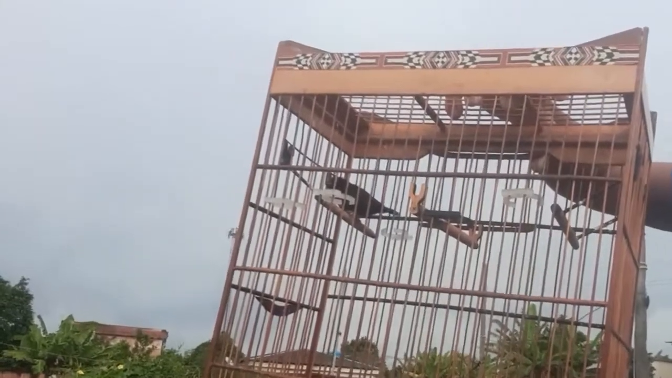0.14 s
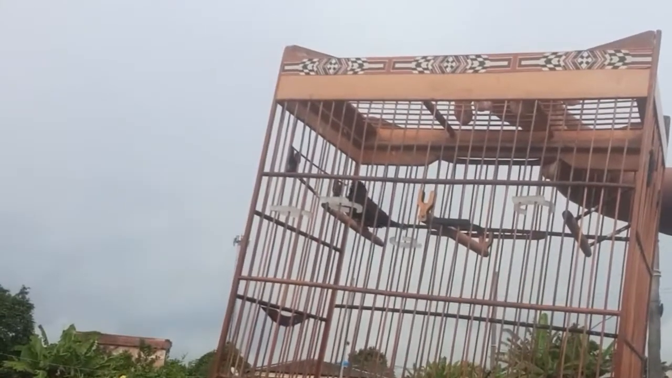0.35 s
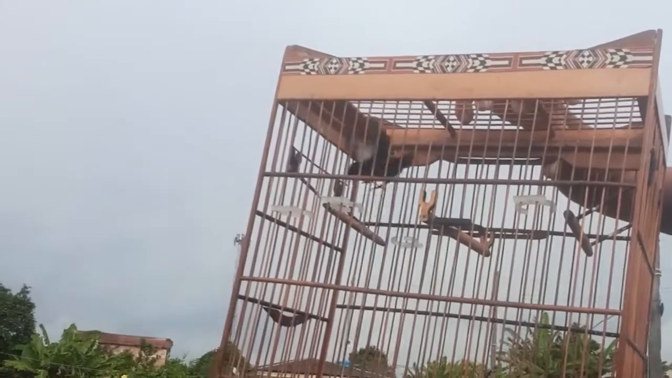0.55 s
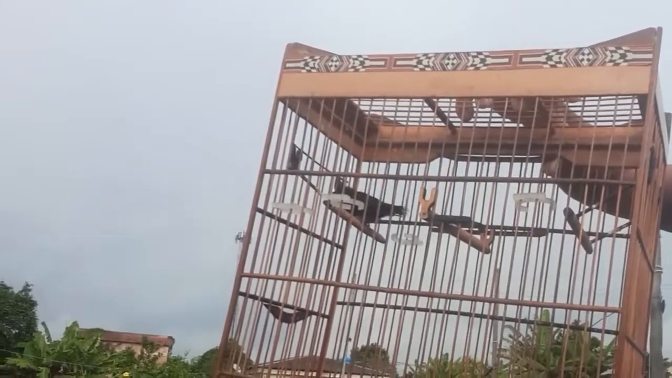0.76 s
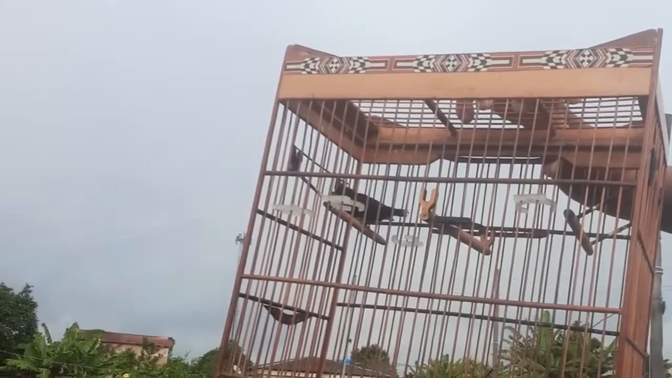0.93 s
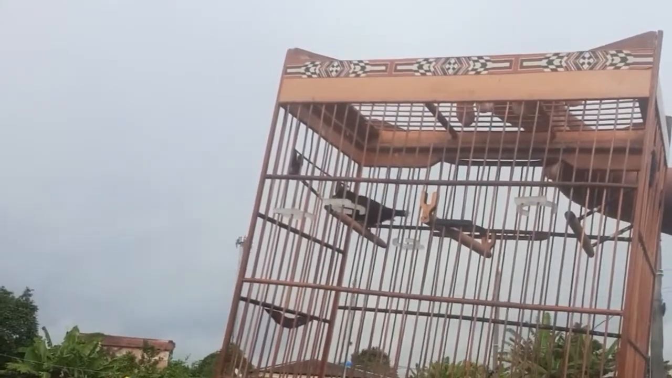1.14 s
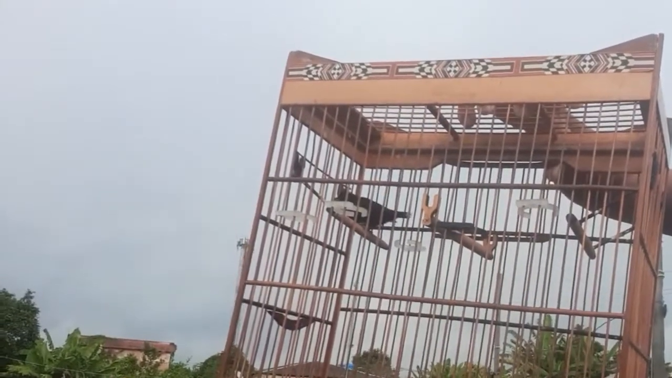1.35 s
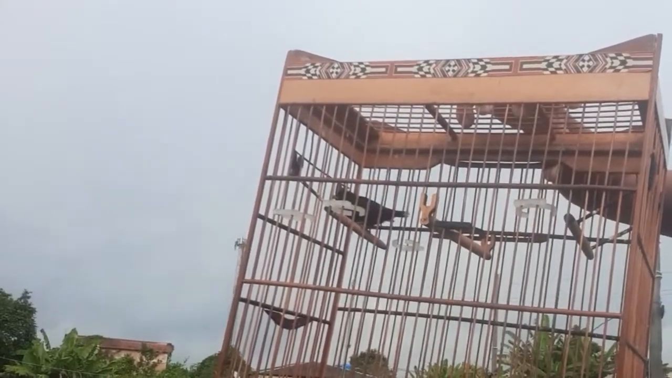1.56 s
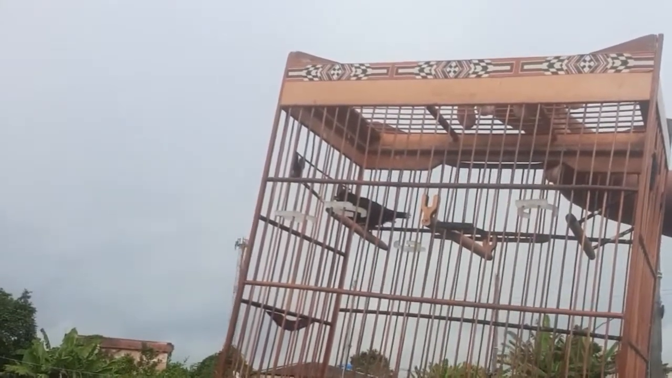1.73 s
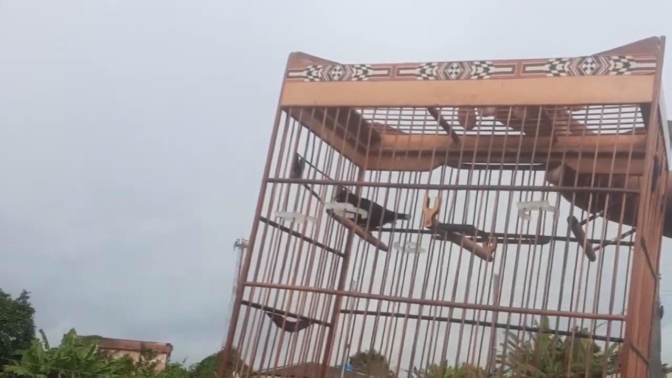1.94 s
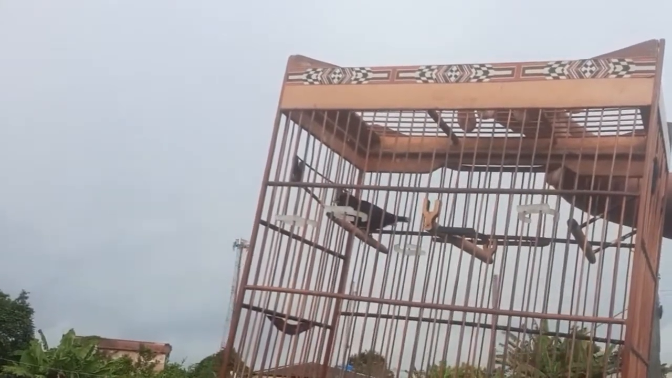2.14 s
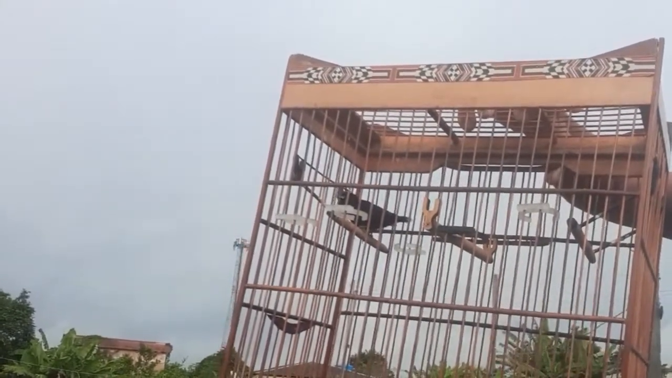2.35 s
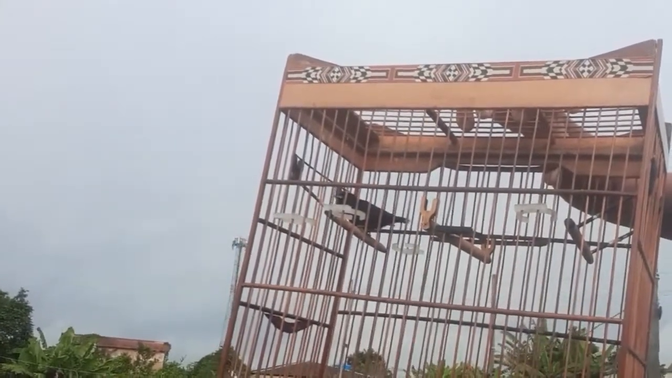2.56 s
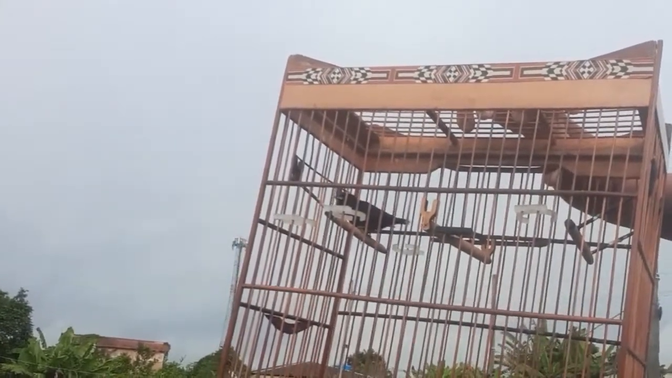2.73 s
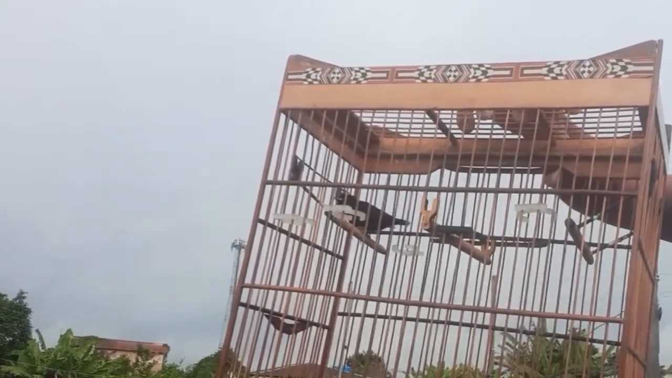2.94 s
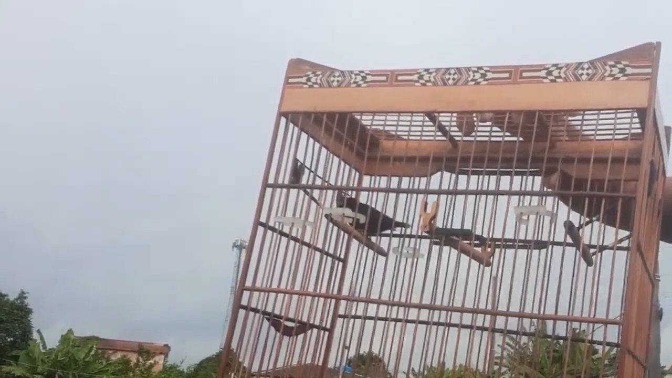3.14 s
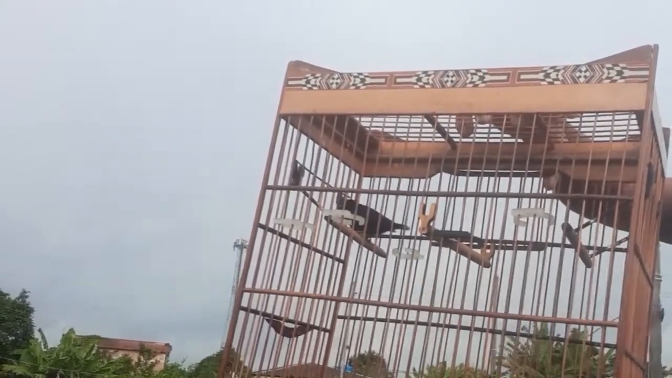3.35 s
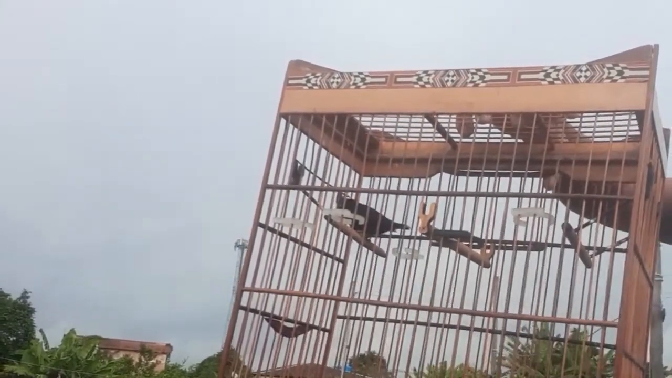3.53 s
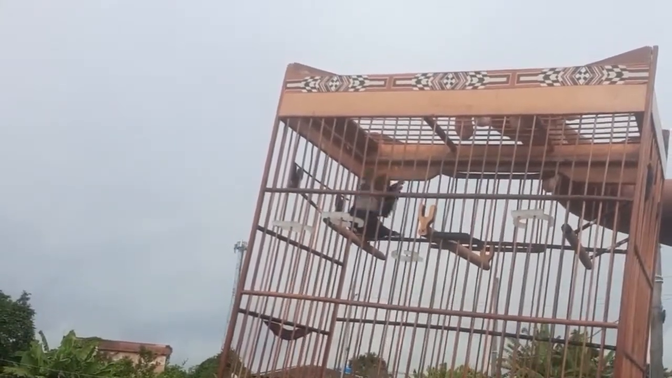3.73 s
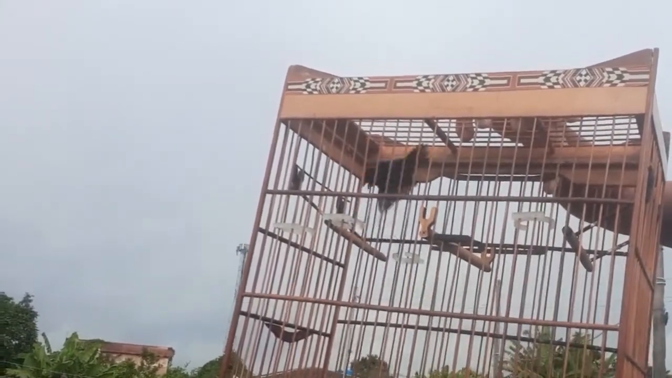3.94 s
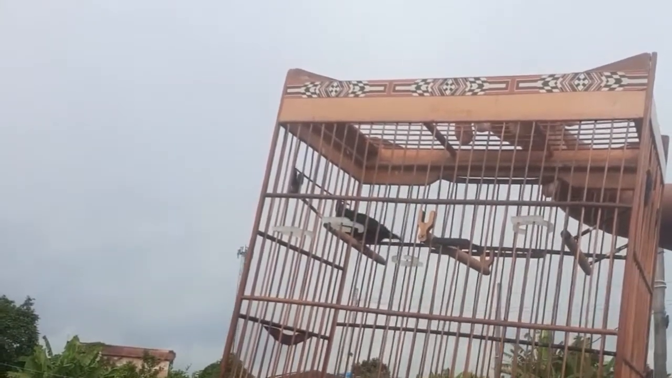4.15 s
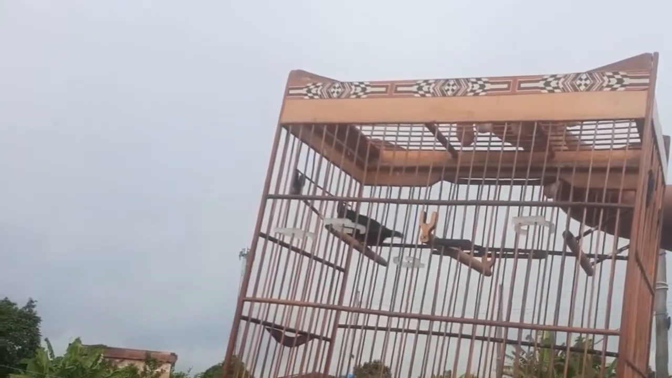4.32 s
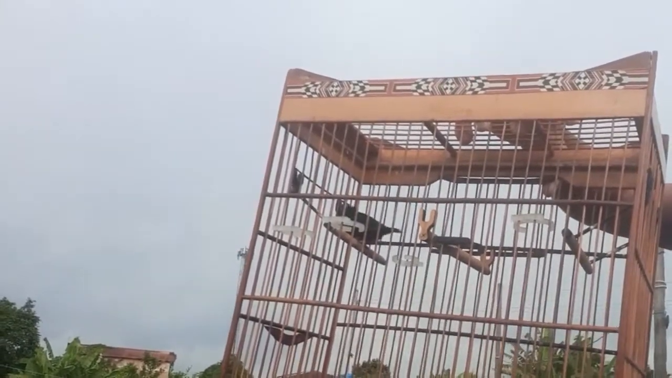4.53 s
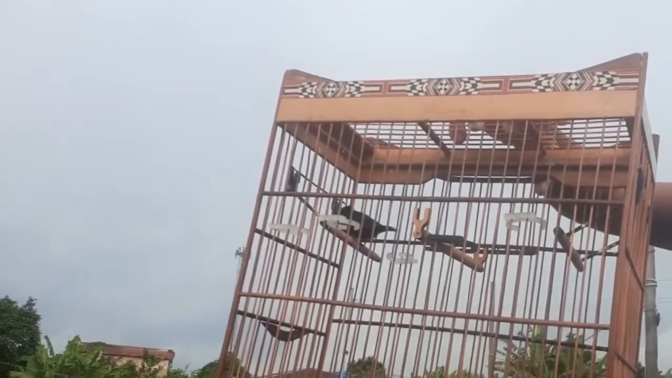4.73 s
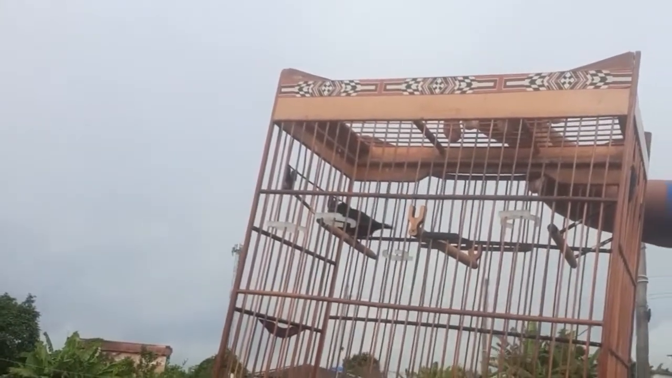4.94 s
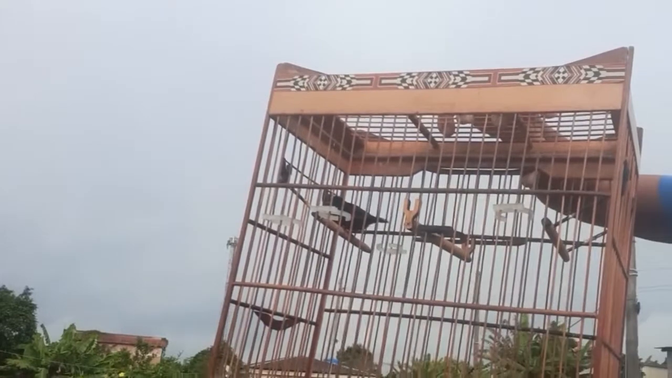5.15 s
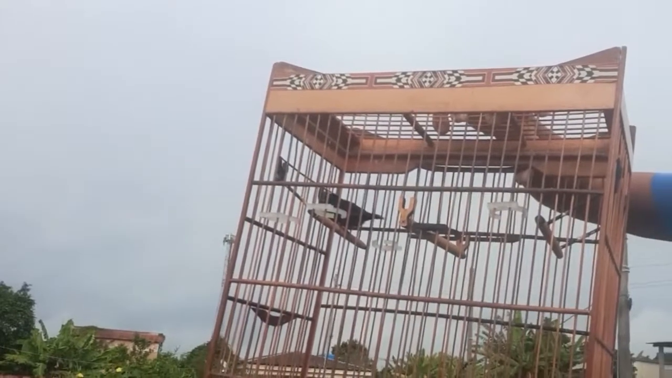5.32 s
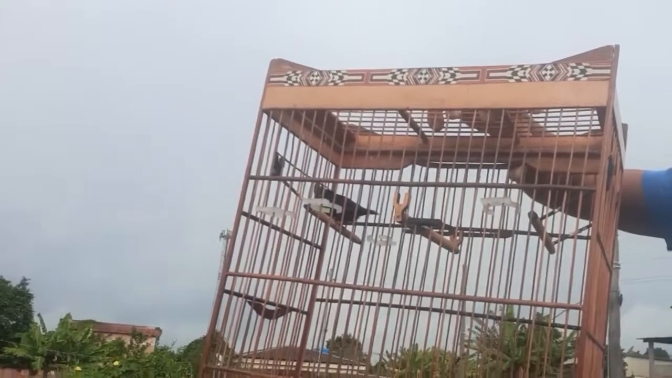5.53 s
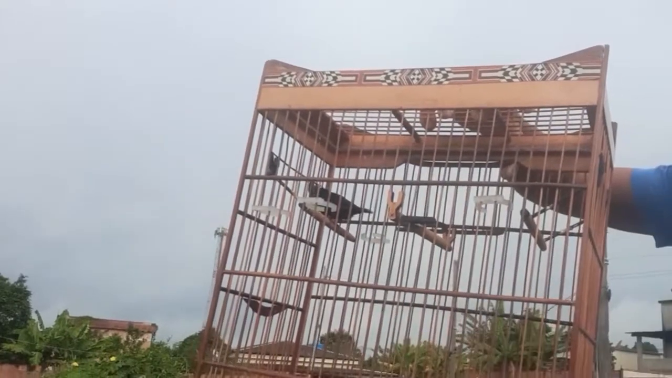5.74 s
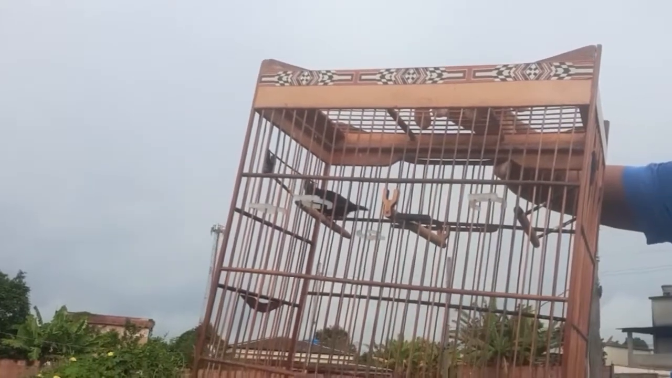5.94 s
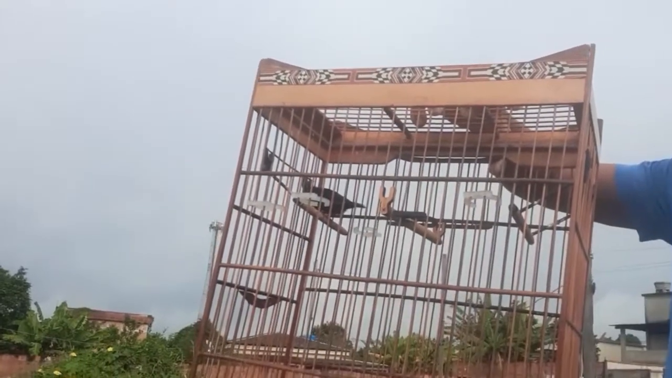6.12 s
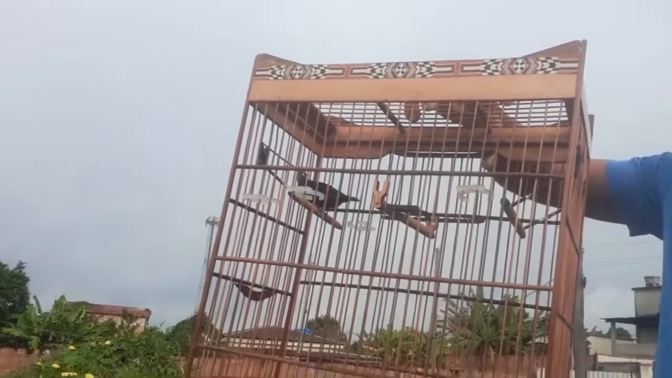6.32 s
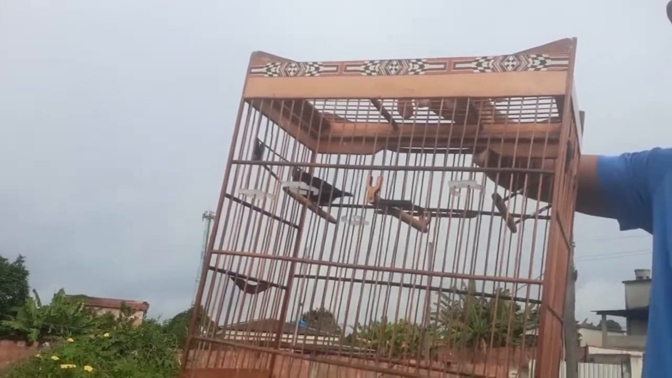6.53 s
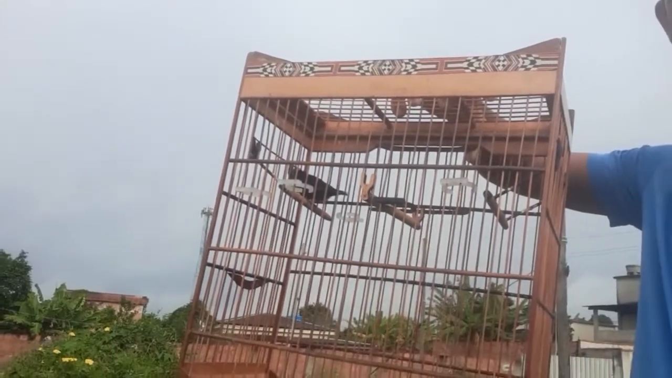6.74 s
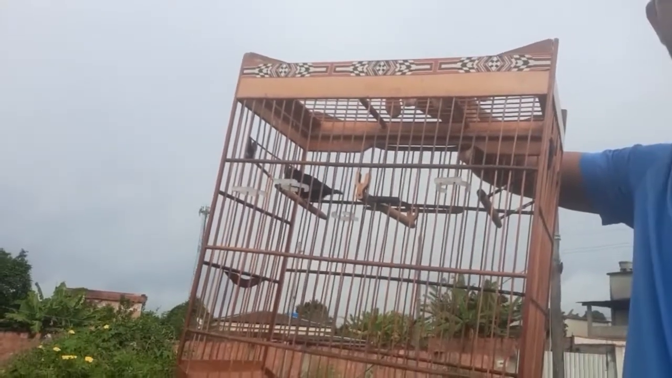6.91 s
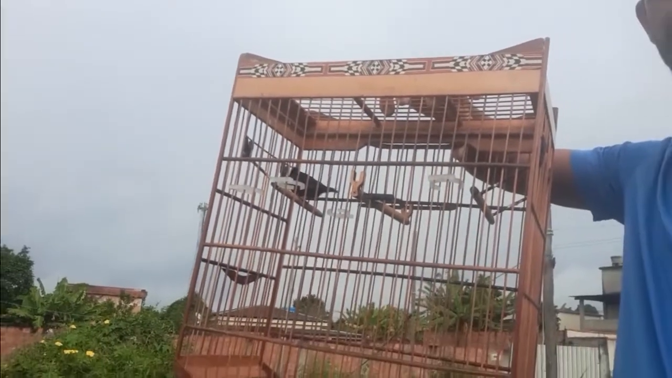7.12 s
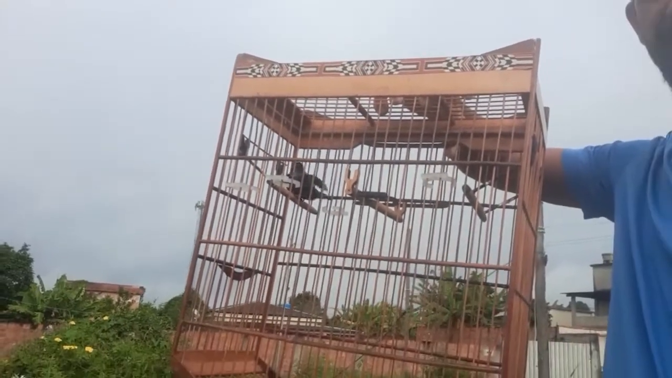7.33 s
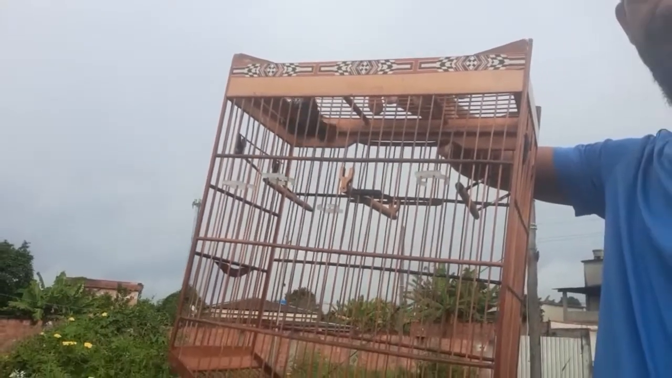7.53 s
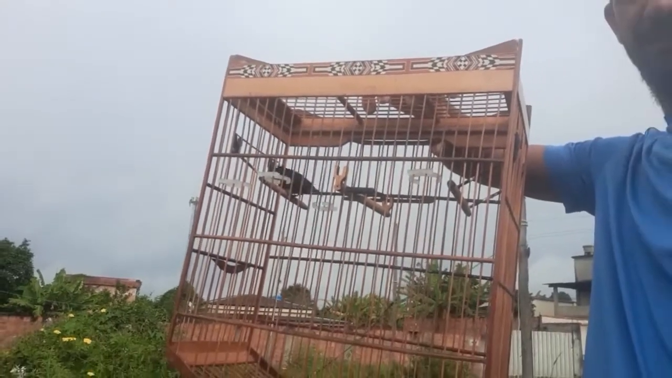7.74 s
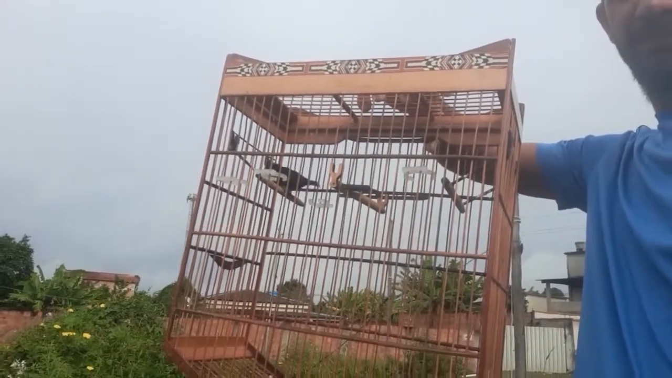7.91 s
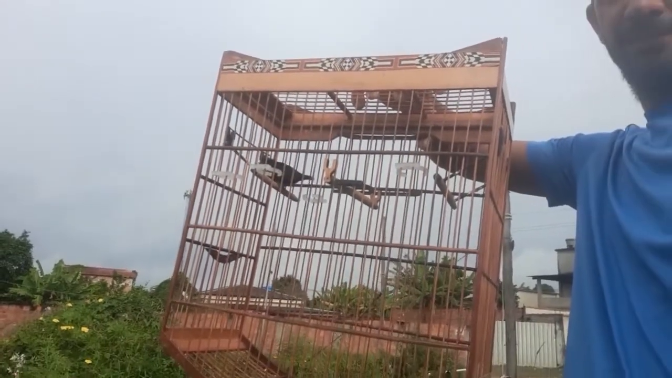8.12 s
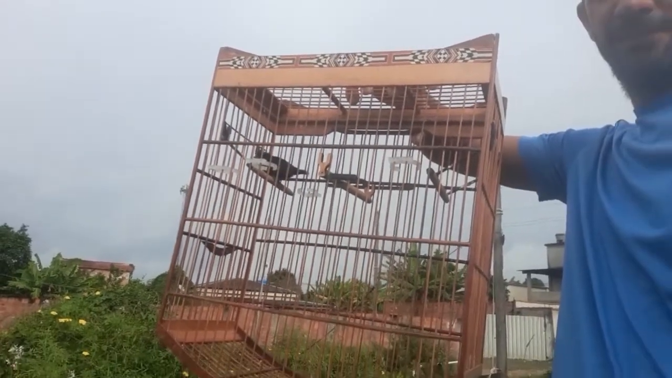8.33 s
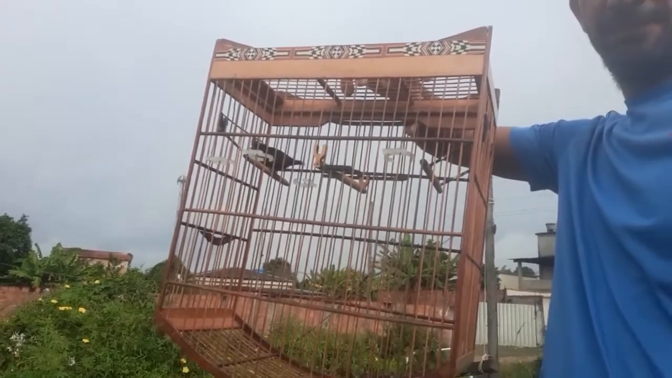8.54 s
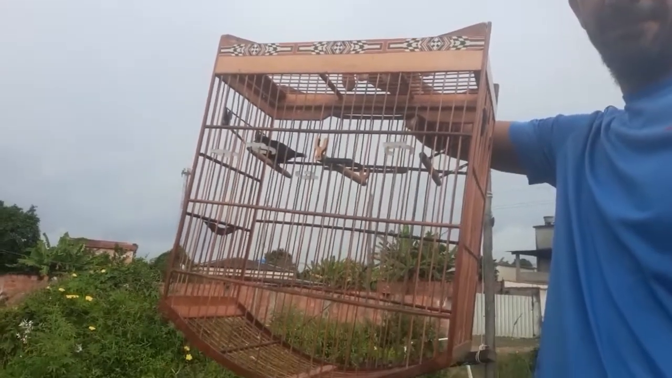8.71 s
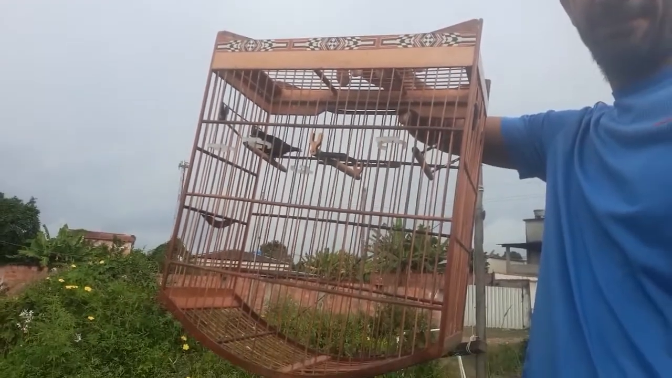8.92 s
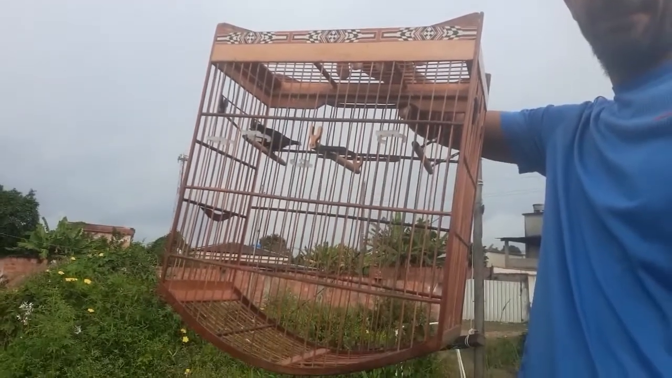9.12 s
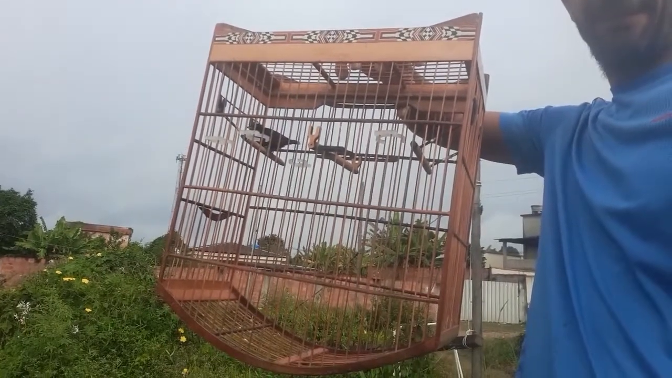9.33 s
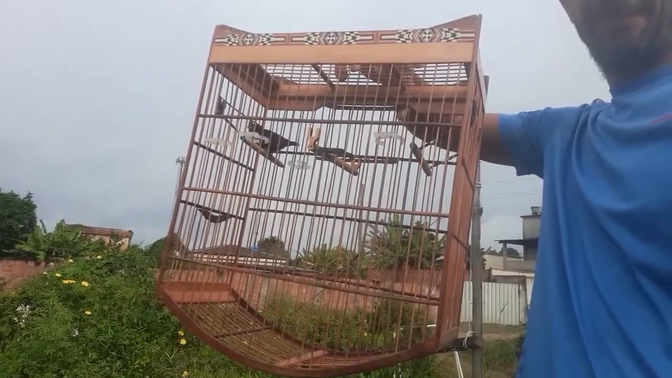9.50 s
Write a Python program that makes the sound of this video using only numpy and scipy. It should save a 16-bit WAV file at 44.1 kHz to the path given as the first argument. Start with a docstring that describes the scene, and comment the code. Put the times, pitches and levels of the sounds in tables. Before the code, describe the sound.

Outdoors in an open yard, a small caged bird close to a phone microphone sings very high ticks that quicken into a buzzing, falling flourish ending in low fading notes. The song comes three times, with quiet gaps, and a fourth begins. Tiny claw hops tap the perch. Cicadas swell behind, katydids pulse, a distant bird whistles late, and soft town hum and slight wind sit underneath.

```python
"""A yard at the edge of a town's hum: a small caged bird sings one song three times and starts a fourth.
Its ticks speed up to a falling buzz, sweeps and a low ending, all gliding near-sines with a weak octave.
Damped modes make the hops on the perch; warbled glides make a far whistling bird; narrow noise, far tones.
Shaped noise makes cicadas, wind, town and hiss; gated narrow noise makes katydids.
Two microphone ports of a phone hear it, and bend the loudest notes a little."""
import sys
import numpy as np
from scipy import signal
from scipy.fft import rfft, irfft
from scipy.io import wavfile
from scipy.ndimage import uniform_filter1d

SR = 44100
rng = np.random.default_rng(int(sys.argv[2]) if len(sys.argv) > 2 else 0)


def unload_wav(signal):
    """Save mono or channel-first audio to the path in sys.argv[1] as 16-bit WAV at rate SR, clipped to [-1, 1]."""
    wavfile.write(
        sys.argv[1],
        SR,
        np.round(np.clip(np.atleast_2d(signal).T, -1, 1) * 32767).astype(np.int16),
    )


N = 422037


def amp(db):
    """Decibels to gain."""
    return 10 ** (np.asarray(db) / 20)


def evened(x):
    """Scales to rms 1."""
    return x / np.sqrt(np.mean(x ** 2) + 1e-20)


def sides(pan_db):
    """Left and right gains for a left-right level difference."""
    return amp(np.array([[.5], [-.5]]) * pan_db)


def add(mix, s, sound):
    """Adds a sound into both channels at time s."""
    part = mix[:, round(s * SR):][:, :sound.shape[-1]]
    part += sound[..., :part.shape[1]]


def traced(rows, stretch=1):
    """Times and columns of a curve, one value a sample."""
    s, *columns = np.transpose(rows)
    t = np.arange(s[0], s[-1], 1 / SR / stretch)
    return t, *(np.interp(t, s, c) for c in columns)


# ticks: turn t/s, level/dB, left-right/dB by the head's turn (before the ports)
TICKS = [(0.1372, -20.0, 1), (0.2567, -20, 1.5), (0.338, -22.5, 2.0), (0.4059, -21.5, -1),
         (0.463, -20.5, 0), (0.5135, -21, -3.0), (0.56, -21.5, -3.5), (0.594, -16.5, -1),
         (0.621, -16, -0.5), (0.646, -11, -2.5), (0.6696, -10.5, -5), (0.692, -12, -1.5),
         (2.0845, -35, -0.5), (2.3378, -29.5, 2), (2.568, -26.5, 3.5), (2.852, -25, 2.5), (3.116, -26.5, 4),
         (3.35, -27.5, 5), (3.5015, -24.5, 3), (3.609, -26.0, 1), (3.69, -24, -5), (3.758, -21.5, -3.5),
         (3.822, -21.5, -0.5), (3.8764, -23, -7), (3.928, -22, -1.5), (3.969, -22, 3.5),
         (3.999, -16.5, -2.0), (4.0258, -13.5, -5), (4.0498, -12.5, -1), (4.072, -13, -7.5),
         (4.0916, -14.5, 1), (5.3406, -30.5, 2), (5.635, -34.5, 0), (5.8466, -32, 2.5), (5.969, -29.5, 2),
         (6.236, -27.5, -0.5), (6.412, -26.5, 0), (6.5832, -26.5, 2.5), (6.7839, -27.5, 5),
         (6.925, -27, 2.5), (7.1029, -26, 2.5), (7.1981, -27, -6), (7.274, -24, -2), (7.345, -22, 4),
         (7.409, -19.5, -2), (7.461, -24.5, -3), (7.509, -26, 8), (7.551, -16.5, 4.5), (7.583, -16.5, 1),
         (7.6105, -14, 2.5), (7.634, -12.5, -1), (7.6557, -11.5, -2), (7.6768, -13.5, 2), (9.2528, -29, -1),
         (9.4647, -25, 0)]
# endings: start t/s, tempo stretch, level/dB, pause before the low notes/s
ENDINGS = [(.704, 1.001, -.1, .0005), (4.101, 1.003, -.6, .004), (7.688, .999, -1.5, -.001)]


def singer():
    """All ticks and the three endings, dry; time left to the next ending sets how a tick is sung."""
    out = np.zeros((2, N))
    starts = np.append(np.transpose(ENDINGS)[0], N / SR + 1)  # the fourth ending lies past the end
    for s, db, pan_db in TICKS:
        fall_s, sound = tick(db, pan_db, starts[starts > s][0] - s)
        add(out, s - fall_s, sound)
    for start, stretch, db, pause_s in ENDINGS:
        add(out, start, buzz(stretch, db))
        add_swoops(out, start, stretch, db)
        add_sweeps(out, start, stretch, db)
        add_notes(out, start, stretch, db, HELD)
        add_notes(out, start + pause_s, stretch, db, low_notes())
    return out


# tick by time left: t/s, lowest f/Hz, highest f/Hz, drop/s, climb/s, extra level at the turn/dB
APPROACH = [(0, 9250, 11600, .0033, .0045, 3), (.04, 9150, 12000, .0038, .005, 1.5),
            (.08, 8950, 12500, .0042, .0057, -4), (.18, 8650, 12400, .005, .0062, -4),
            (.35, 8800, 12400, .0053, .0072, -13), (.5, 9100, 12000, .004, .010, -1.5),
            (1, 9220, 11600, .0034, .014, 2.5)]
# level along a tick: place (-1 start, 0 turn, 1 end), level/dB
TICK_SHAPE = [(-1, -26), (-.75, -4), (-.4, 0), (.6, 1), (.85, -5), (1, -30)]
LEAD_RAD, LEAD_RAD_PER_DB = .4, -.15  # phase the left leads, by the head's turn
BARS_SHARE, BARS_MAX_S = .27, .0016  # largest share thrown back by the nearest bars, longest detour


def tick(db, pan_db, left_s):
    """Pitch drops fast, turns and climbs; the bars colour each port; returns time to the turn and sound."""
    s, *columns = np.transpose(APPROACH)
    low_hz, top_hz, fall_s, climb_s, turn_db = (np.interp(left_s, s, c) for c in columns)
    t = np.arange(-fall_s, climb_s, 1 / SR)
    u = np.where(t < 0, t / fall_s, t / climb_s)
    hz = low_hz + (top_hz - low_hz) * abs(u) ** 2.3
    shape_db = np.interp(u, *np.transpose(TICK_SHAPE)) + turn_db * np.clip(1 - 2 * abs(u), 0, 1)
    sound = syrinx(hz, amp(db + shape_db))
    sound = signal.hilbert(np.append(sound, np.zeros(99)))  # room for the detour
    lead_rad = LEAD_RAD + LEAD_RAD_PER_DB * pan_db
    turned = (sound * np.exp(.5j * np.array([[1], [-1]]) * lead_rad)).real
    share = BARS_SHARE * np.clip(1 - left_s, .2, 1)  # grows as the ending nears
    back = np.array([np.roll(v, round(BARS_MAX_S * SR * rng.uniform(.2, 1))) for v in turned])
    return fall_s, sides(pan_db) * (turned + share * back) / np.sqrt(1 + share ** 2)


# buzz: t/s into the ending, centre f/Hz, swing f/Hz, level/dB, mean wobbles per s
BUZZ = [(0, 10300, 900, -30, 300), (.012, 10200, 1400, -21, 315), (.025, 9800, 1150, -17, 312),
        (.045, 9400, 950, -15, 310), (.071, 9100, 1100, -17.5, 270)]
RATE_JITTER = .08  # rms, share of the wobble rate


def buzz(stretch, db):
    """Pitch wobbles fast round a falling centre, loudest at the low turns."""
    t, centre_hz, swing_hz, level_db, rate = traced(BUZZ, stretch)
    rate = rate * (1 + RATE_JITTER * evened(uniform_filter1d(rng.standard_normal(len(t)), size=100)))
    wobble = np.cos(2 * np.pi * (np.cumsum(rate) / SR + rng.random()))
    return syrinx(centre_hz + swing_hz * wobble, amp(db + level_db + rasp_db(t) - 3.5 * wobble))


# swoops: t/s into the ending, length/s, top f/Hz
SWOOPS = [(.0715, .008, 11600), (.0795, .0075, 11600), (.087, .012, 10800)]
SWOOP_BASE_HZ, SWOOP_RISE_SHARE = 7900, .6  # share of the time spent rising
SWOOP_BASE_DB, SWOOP_DB_PER_KHZ = -10.5, -3.4  # softer up high


def add_swoops(out, start, stretch, db):
    """Wide straight rises from a base pitch to a top and back."""
    for s, length_s, top_hz in SWOOPS:
        up = np.interp(np.linspace(0, 1, round(length_s * SR)), [0, SWOOP_RISE_SHARE, 1], [0, 1, 0])
        above_hz = (top_hz - SWOOP_BASE_HZ) * uniform_filter1d(up, size=30)
        level_db = db + SWOOP_BASE_DB + SWOOP_DB_PER_KHZ * above_hz / 1000
        add(out, start + s * stretch, syrinx(SWOOP_BASE_HZ + above_hz, amp(level_db)))


# the two sides of the syrinx in a sweep: t/s, f/Hz, relative level/dB
LOW_VOICE = [(0, 8100, -3), (.006, 6800, -4), (.0105, 5750, -3), (.0135, 6150, -1), (.0165, 5950, -5)]
HIGH_VOICE = [(.003, 8300, -8), (.008, 7600, -4), (.010, 6500, 2), (.0125, 6150, 3.5), (.0155, 6000, 1),
              (.0172, 5900, -20)]
SWEEP_COUNT, SWEEP_START_S, SWEEP_GAP_S = 8, .1182, .0135
LOW_DB, LOW_FADE_DB = -17.5, -14  # first sweep, change by the last
HIGH_DB, HIGH_FADE_DB, HIGH_FADE_POWER = -18.5, -10, 5
SWEEP_JITTER_DB = 1.5  # standard deviation


def add_sweeps(out, start, stretch, db):
    """A run of falling sweeps, each begun by one side of the syrinx and joined by the other."""
    for k in range(SWEEP_COUNT):
        late = k / (SWEEP_COUNT - 1)
        low_db = LOW_DB + LOW_FADE_DB * late
        high_db = HIGH_DB + HIGH_FADE_DB * late ** HIGH_FADE_POWER
        for voice, voice_db in ((LOW_VOICE, low_db), (HIGH_VOICE, high_db)):
            t, hz, level_db = traced(voice)
            level_db = level_db + rasp_db(t) + SWEEP_JITTER_DB * rng.standard_normal()
            sweep = syrinx(uniform_filter1d(hz, size=40), amp(db + voice_db + level_db))
            add(out, start + (SWEEP_START_S + k * SWEEP_GAP_S) * stretch + t[0], sweep)


RASP_DB = 2.1  # rms


def rasp_db(t):
    """Smooth quick chance flutter of the level in buzz and sweeps."""
    return RASP_DB * evened(np.convolve(rng.standard_normal(len(t)), np.hanning(90), "same"))


# overlapping held notes: t/s into the ending, length/s, middle f/Hz, rise f/Hz, level/dB, peak place 0-1
HELD = [(.097, .010, 7350, 500, -14, .4), (.099, .015, 8000, 60, -14, .5), (.112, .008, 8000, 30, -16, .5)]


def add_notes(out, start, stretch, db, rows):
    """Notes whose pitch rises evenly while the level swells to its peak and falls."""
    for s, length_s, middle_hz, rise_hz, level_db, peak in rows:
        u = np.linspace(0, 1, round(length_s * SR))
        swell = np.sin(np.pi * np.interp(u, [0, peak, 1], [0, .5, 1]))
        sound = syrinx(middle_hz + rise_hz * (u - .5), amp(db + level_db) * abs(swell) ** 2)
        add(out, start + s * stretch, sound)


# rising note: t/s into the ending, length/s, middle f/Hz, rise f/Hz, level/dB, peak place 0-1
RISING = (.228, .029, 4070, 900, -13, .75)
RUN_COUNT, RUN_SETTLE_NOTES = 7, 1.6
RUN_START_S, RUN_GAP_S, RUN_LINGER_S = .26, .0142, .009  # linger: extra spacing early on, summed
RUN_NOTE_S, RUN_LONGER_S = .011, .004  # settled length, first note's excess
RUN_LOW_HZ, RUN_SINK_HZ, RUN_RISE_HZ = 2960, 470, 380
RUN_DB, RUN_DB_PER_NOTE = -20.5, -4.2


def low_notes():
    """Rows of the rising note and the short notes after it, which quicken, sink and fade."""
    rows = [RISING]
    for k in range(RUN_COUNT):
        fresh = np.exp(-k / RUN_SETTLE_NOTES)
        s = RUN_START_S + RUN_GAP_S * k + RUN_LINGER_S * (1 - fresh)
        length_s = RUN_NOTE_S + RUN_LONGER_S * fresh
        middle_hz = RUN_LOW_HZ + RUN_SINK_HZ * fresh
        rows.append((s, length_s, middle_hz, RUN_RISE_HZ, RUN_DB + RUN_DB_PER_NOTE * k, .5))
    return rows


OCTAVE_MAX_DB = -11.5  # before the pitch weighting


def syrinx(hz, level):
    """A near sine with a weak octave, strongest near 16 kHz and fading at the top of hearing."""
    phase = 2 * np.pi * (np.cumsum(hz) / SR + rng.random())
    weight = np.clip(10 - hz / 1000, 0, 1) * np.clip(hz / 3000 - 1.6, .05, 1)
    octave = amp(OCTAVE_MAX_DB) * weight * np.sin(2 * phase)
    return level * (np.sin(phase) + octave) * signal.windows.tukey(len(hz), 60 / len(hz))


# claws on the perch: t/s, level/dB, pitch factor
HOPS = [(0.5166, -35, .97), (0.589, -26, 1.04), (3.8522, -32.5, 1.12), (3.9405, -31.5, 1.06),
        (4.034, -18, 1.04), (4.11, -32, 1), (6.884, -32, 1.1), (7.4704, -28.5, 0.99), (7.66, -26.5, 0.82)]
# perch modes: f/Hz at pitch factor 1, level/dB, t60/s
PERCH = [(1674, -4.5, 0.011), (3380, -11, 0.0049)]
RATTLE_COUNT, RATTLE_SPAN_S, RATTLE_MIN_DB = 14, .28, -47  # per ending


def hops():
    """Each landing rings the damped modes of the perch; small cage rattles lead up to each ending."""
    out, t = np.zeros((2, N)), np.arange(2000) / SR
    rattles = []
    for start, *_ in ENDINGS:
        for a, b, c in rng.random((RATTLE_COUNT, 3)):
            rattles.append((start - RATTLE_SPAN_S * a, RATTLE_MIN_DB + 8 * b, .6 + .7 * c))
    for s, db, pitch in HOPS + rattles:
        ring = sum(amp(d - 60 * t / t60) * np.sin(2 * np.pi * hz * pitch * t) for hz, d, t60 in PERCH)
        add(out, s, amp(db) * ring * np.minimum(t / 0.00054, 1))
    return out


# whistles: t/s, length/s, first f/Hz, f/Hz sunk towards, sinking time/s, peak level/dB, time to peak/s,
# fade/(dB/s), burr depth 0-1
WHISTLES = [(6.36, .33, 2620, 1550, .13, -38, .09, -400, .9),
            (6.78, .31, 2620, 1550, .135, -37, .095, -350, 1),
            (7.15, .125, 3600, 1900, .055, -40, .03, -110, 0),
            (7.497, .245, 3280, 1500, .25, -38.5, .05, -90, 0)]
WHISTLE_START_DB, WHISTLE_TRAIL_DB = -20, -31  # relative to the peak
BURR_HOLD_S, BURR_FULL_S, BURR_SWING_HZ = .036, .052, 135  # at depth 1; burr gone at twice BURR_FULL_S
BURR_START_PER_S, BURR_SLOWING_PER_S2 = 148, 400


def far_bird():
    """Falling whistles; burry ones hold at first and warble fast, which splits them into close lines."""
    out = np.zeros((2, N))
    for s, length_s, first_hz, low_hz, sink_s, db, peak_s, fade_db, depth in WHISTLES:
        t = np.arange(0, length_s, 1 / SR)
        falling_s = np.logaddexp(0, (t - depth * BURR_HOLD_S) / .007) * .007  # soft start of the fall
        burr = depth * np.clip(2 - t / BURR_FULL_S, 0, 1)
        turn = 2 * np.pi * (BURR_START_PER_S - BURR_SLOWING_PER_S2 / 2 * t) * t
        hz = low_hz + (first_hz - low_hz) * np.exp(-falling_s / sink_s) + BURR_SWING_HZ * burr * np.cos(turn)
        rise_db = WHISTLE_START_DB * (1 - t / peak_s) ** 2
        decay_db = np.maximum(fade_db * (t - peak_s), WHISTLE_TRAIL_DB)
        level = amp(db + np.where(t < peak_s, rise_db, decay_db))
        throb = np.exp(.5 * burr * np.sin(turn))
        tone = np.sin(2 * np.pi * np.cumsum(hz) / SR) * signal.windows.tukey(len(t), .1)
        add(out, s, sides(3.8) * level * throb * tone)
    return out


# far tones: t/s, length/s, f/Hz, rms level/dB
FAINT = [(0.28, 0.14, 1630, -72), (3.277, 0.12, 1615, -67.5), (5.048, 0.068, 690, -62.5),
         (5.7, 0.58, 2190, -69), (8.323, 0.31, 1900, -70), (1.395, 0.1, 1630, -68.5),
         (0.37, 0.054, 2860, -73), (7.305, 0.075, 1620, -64), (7.293, 0.037, 3000, -64),
         (7.538, 0.024, 3700, -61)]


def faint_tones():
    """Brief fuzzy far tones of narrow noise."""
    out = np.zeros((2, N))
    for s, length_s, hz, db in FAINT:
        gate = signal.windows.tukey(round(length_s * SR), .5)
        add(out, s, amp(db) * wing(hz, 90, gate))
    return out


# cicada level: t/s, level/dB
CICADAS_DB = [(0.0, -47.5), (0.61, -40), (1.12, -48), (3.76, -42.5), (4.931, -49.5), (5.25, -44),
              (6.02, -46.5), (6.4, -39), (7.06, -48.5), (7.509, -39), (8.15, -51), (8.42, -48.5),
              (8.64, -43), (9.17, -49.5), (9.57, -42.5)]
# cicada colour: f/Hz, relative density/dB
CICADAS = [(2350, -40.5), (4000, -34.5), (4560, -17.5), (4950, 1), (5210, 4), (5400, -3.5), (5560, 3.5),
           (5960, -4.5), (6280, -30), (6640, -20), (7060, -72), (7400, -73)]


def cicadas():
    """A chorus too dense to tell singers apart: banded noise that swells."""
    return wash(CICADAS, CICADAS_DB, -0.23, -0.55, 0.92, 0.8, size=512)


# phrasing katydid: t/s, phrases sung so far
PHRASES = [(0, .06), (6, 44.9), (7, 52.15), (9.6, 71.35)]
# its wing tone and octave: f/Hz, width/Hz, level/dB
WING_TONES = [(5800, 60, -60), (11800, 66, -70)]
# trilling katydid: f/Hz, width/Hz, level/dB
TRILL = [(10100, 150, -76), (10900, 150, -77)]
TRILL_PER_S = 46
# thin steady lines: f/Hz, width/Hz, level/dB
THIN = [(4420, 160, -71), (6410, 98, -72.5)]


def katydids():
    """One scrapes three short pulses a phrase; one trills and swells; two more hold thin steady lines."""
    t = np.arange(N) / SR
    phrase = np.interp(t, *np.transpose(PHRASES))
    into_s = ((phrase + .5) % 1 - .5) / 7.4  # from the middle of the phrase
    pulses = ((-.043, -8), (-.012, -0.5), (.021, 1))  # t/s, level/dB
    gate = sum(amp(db) * np.exp(-((into_s - s) / 0.011) ** 2) for s, db in pulses)
    phrased = sides(-2.0) * sum(amp(db) * wing(hz, width, gate) for hz, width, db in WING_TONES)
    swell = amp(4 * sum(np.sin(2 * np.pi * (f * t + rng.random())) for f in (.31, .7, 1.3)))
    trill_gate = swell * np.sin(np.pi * TRILL_PER_S * t) ** 4
    trill = sum(amp(db) * wing(hz, width, trill_gate) for hz, width, db in TRILL)
    thin = sum(amp(db) * wing(hz, width, np.ones(N)) for hz, width, db in THIN)
    return phrased + trill + thin


def wing(hz, width_hz, gate):
    """A narrow, wandering tone, partly alike at the two ports, let through by a gate; rms 1."""
    a, b = rng.standard_normal((2, 2, len(gate)))
    drift = signal.lfilter(*signal.butter(2, width_hz / 2, fs=SR), a + 1j * b)
    carrier = np.exp(2j * np.pi * hz * np.arange(len(gate)) / SR)
    return evened(gate * ((drift + .5 * drift[::-1]) * carrier).real)


# town level: t/s, level/dB
TOWN_DB = [(0, -70.5), (1.199, -70), (3.6, -62.5), (4.6, -63.5), (5.499, -59.5), (7.599, -58.5), (8.2, -68),
           (9.57, -55.5)]
# town colour: f/Hz, relative density/dB
TOWN = [(88, -53.5), (150, -21.5), (317, -8), (486, 0), (894, -13.5), (1430, -14), (2200, -14),
        (2940, -21.5), (4100, -30), (5330, -51.5)]


def town():
    """The hum of a town: low and middle noise."""
    return wash(TOWN, TOWN_DB, 0.36, 2.7, 2.16, 0.56, size=1024)


# wind level: t/s, level/dB
WIND_DB = [(0, -68), (1.301, -71), (3.3, -63.5), (3.8, -63), (4.602, -66), (7.1, -63), (7.399, -63.5),
           (7.751, -49.5), (8.097, -73), (8.9, -71.5), (9.57, -59.5)]
# wind colour: f/Hz, relative density/dB
WIND = [(28, -58), (45, -28), (62, 4), (120, 1), (220, -12.5), (400, -56)]


def wind():
    """Low gusting noise, nearly alike at both ports."""
    return wash(WIND, WIND_DB, 0.93, -.6, 2.6, 1.1, size=2048)


# hiss colour: f/Hz, relative density/dB
HISS = [(9000, -74.5), (9800, 8), (10500, 4.5), (11400, 6.5), (12200, 6.5), (13000, -8), (13300, -28)]
# top level: t/s, level/dB
TOP_DB = [(0, -72.5), (9.57, -73)]
# top colour: f/Hz, relative density/dB
TOP = [(13300, -50), (13900, -27.5), (14300, -23), (15000, -0.5), (16000, -9.5)]


def hiss():
    """High noise rising and falling with the cicadas, 20 dB below them, and a near-steady top layer."""
    upper = amp(-20.0) * wash(HISS, CICADAS_DB, 0.028, -0.75, 1.5, 0.55, size=512)
    return upper + wash(TOP, TOP_DB, .2, -2.5, 1.1, 0.55, size=512)


def wash(shape, curve, same, pan_db, patchy_db, flicker_db, size):
    """Random short-time spectra with drifting patches and a flicker shared by all bins."""
    frames, hz = 4 * N // size + 5, np.fft.rfftfreq(size, 1 / SR)
    a, b, c, d, patches = rng.standard_normal((frames, len(hz), 5)).T
    flicker = evened(uniform_filter1d(patches[0], size=3))
    patches = evened(uniform_filter1d(uniform_filter1d(patches, size=6, axis=0), size=12, axis=1))
    f, db = np.transpose(shape)
    colour_db = np.interp(np.log(hz + 1), np.log(f), db, -99, -99)[:, None]
    left = a + 1j * b
    right = same * left + np.sqrt(1 - same ** 2) * (c + 1j * d)  # same: left-right correlation
    z = np.array([left, right]) * amp(colour_db + patchy_db * patches + flicker_db * flicker)
    noise = evened(signal.istft(z, nperseg=size, noverlap=3 * size // 4)[1][:, :N])
    return noise * sides(pan_db) * amp(np.interp(np.arange(N) / SR, *np.transpose(curve)))


# late wall echoes: t/s
WALLS = (.112, .138, .16)
NEAR_DB, NEAR_T60_S = 12, .1  # quick scatter close by, over the long tail


def yard(x, early_db, tail_db, t60, scatter_hz, walls_db):
    """Direct sound, echoes off cage, ground and far walls, and a sparse tail, other taps for each port."""
    t = np.arange(SR // 2) / SR
    taps = rng.choice([-1., 1.], (2, len(t))) * (rng.random((2, len(t))) < .05)
    decay = amp(-60 * t / t60) + amp(NEAR_DB - 60 * t / NEAR_T60_S)  # fast, then slow
    tail = taps * decay * (t > .004)
    reply = amp(tail_db) * tail / np.linalg.norm(tail, axis=1, keepdims=True)
    for delay_s, db in [(.0011, -3), (.0045, -13), (.0118, -17)]:
        reply[[0, 1], round(delay_s * SR) + rng.integers(0, 9, 2)] += amp(early_db + db)
    # thin bars and leaves return mostly treble
    reply = signal.lfilter(*signal.butter(2, scatter_hz, "high", fs=SR), reply)
    for delay_s in WALLS:
        reply[[0, 1], round(delay_s * SR) + rng.integers(0, 60, 2)] += amp(walls_db)
    reply[:, 0] = 1
    return signal.fftconvolve(x, reply, axes=1)[:, :N]


# ports hearing the cage: f/Hz, left-right/dB, phase the left leads/rad
PORTS = [(1500, 3, 2.1), (3200, 6, 2.7), (4200, 10, 1.9), (6200, 1.1, -.2), (8200, -.5, .2),
         (9500, -.3, 1.1), (15000, 1.1, .3)]


def ports(x):
    """The phone's body shades and delays each port by frequency."""
    hz, (f, db, lead_rad) = np.fft.rfftfreq(N, 1 / SR), np.transpose(PORTS)
    half = np.array([[.5], [-.5]])
    shade = amp(half * np.interp(hz, f, db))
    return irfft(rfft(x) * shade * np.exp(1j * half * np.interp(hz, f, lead_rad)), N)


def scene():
    """The cage close by, the far bird wetter, the noise layers and insects around."""
    near = singer() + hops()
    cage = ports(yard(near, early_db=-0.5, tail_db=-13.5, t60=0.46, scatter_hz=4790, walls_db=-43.5))
    whistles = yard(far_bird(), early_db=-18.5, tail_db=-4.5, t60=1.0, scatter_hz=1190, walls_db=-20.5)
    return cage + whistles + faint_tones() + cicadas() + katydids() + town() + wind() + hiss()


EDGE_HZ = 16000


def record(dry):
    """Lopsided capsules: loud notes leave their envelope as a low rumble; then the upper band limit."""
    # the port resonance moves the capsule most
    ringing = signal.sosfilt(signal.butter(2, [7200, 8700], "band", fs=SR, output="sos"), dry)
    rumble = signal.sosfilt(signal.butter(2, [70, 1900], "band", fs=SR, output="sos"), ringing ** 2)
    bent = dry + np.array([[.3], [1.05]]) * rumble
    lowpass = signal.firwin(511, EDGE_HZ, window=("kaiser", 9), fs=SR)
    return signal.oaconvolve(bent, lowpass[None], "same")


dry = scene()
out = record(dry)
unload_wav(out)
```